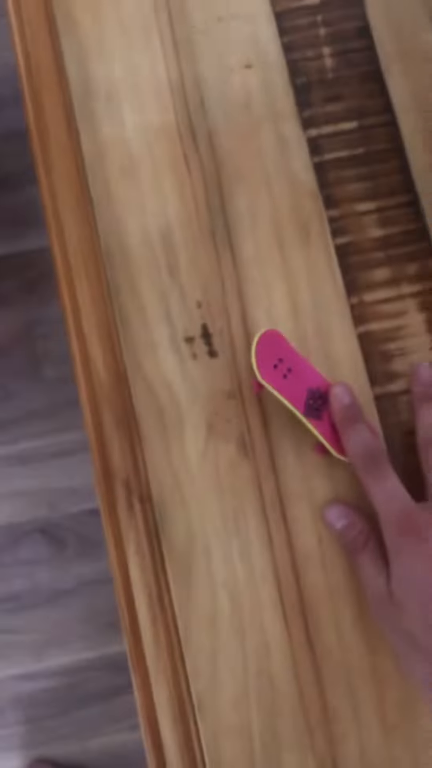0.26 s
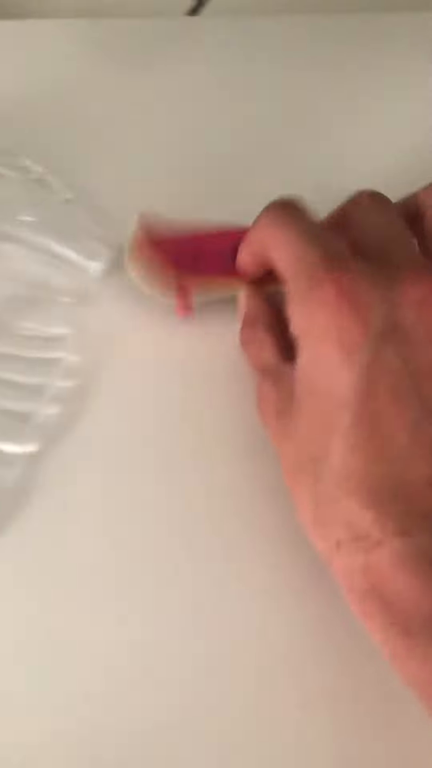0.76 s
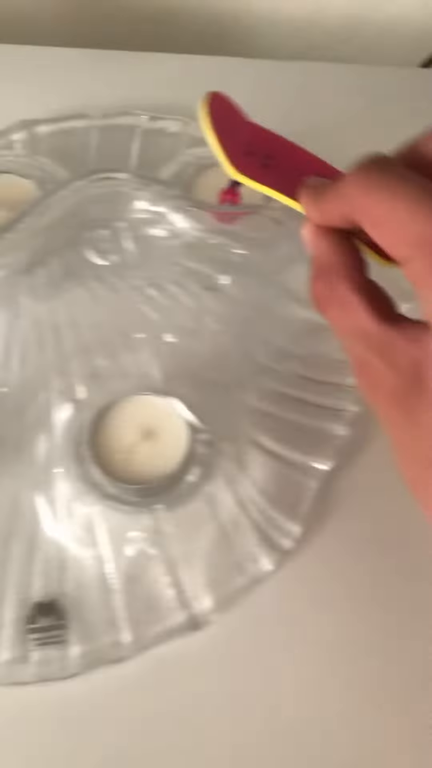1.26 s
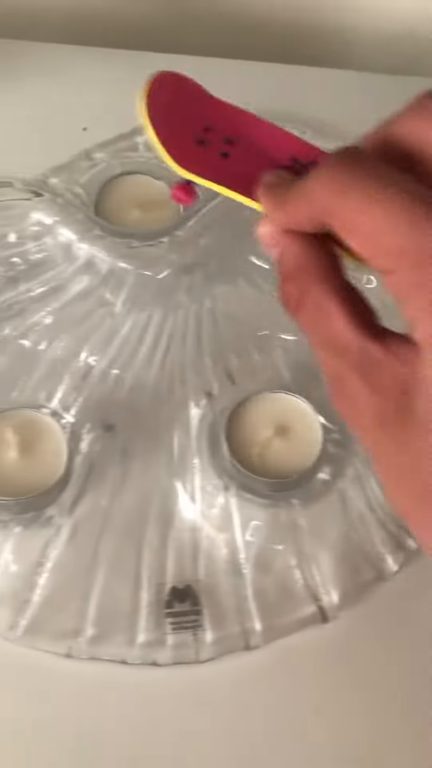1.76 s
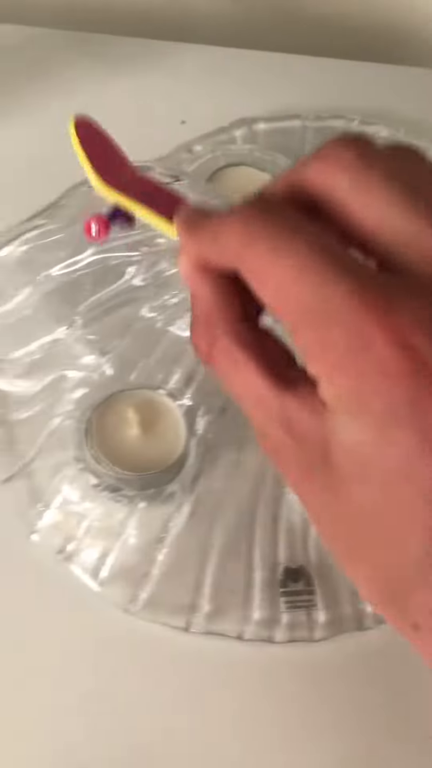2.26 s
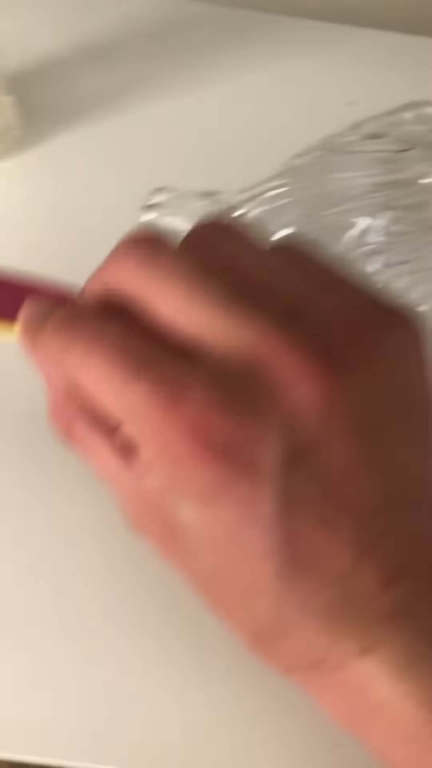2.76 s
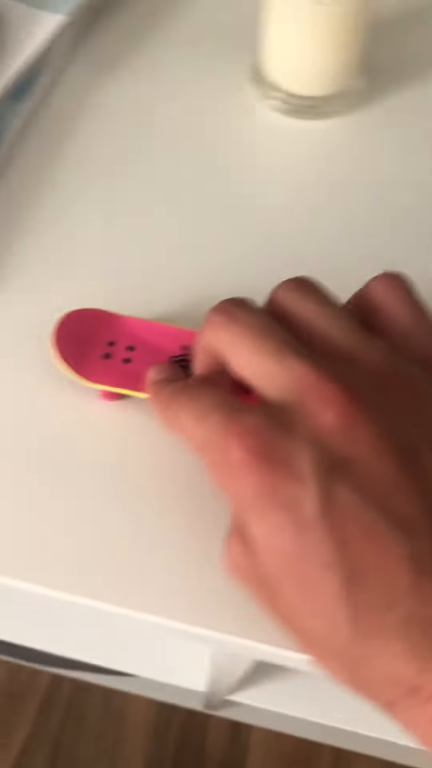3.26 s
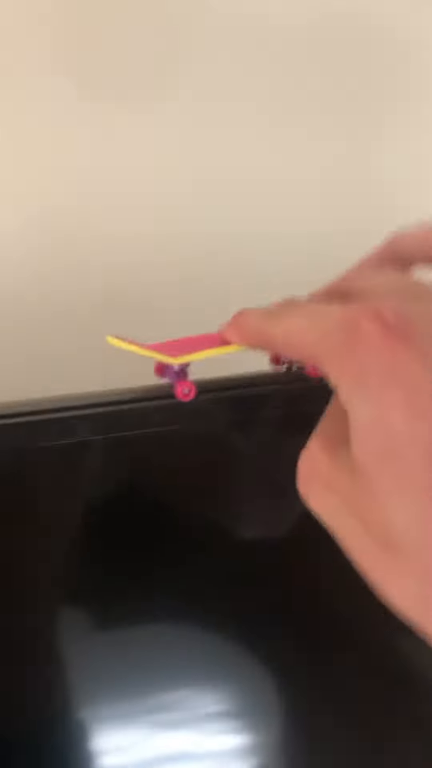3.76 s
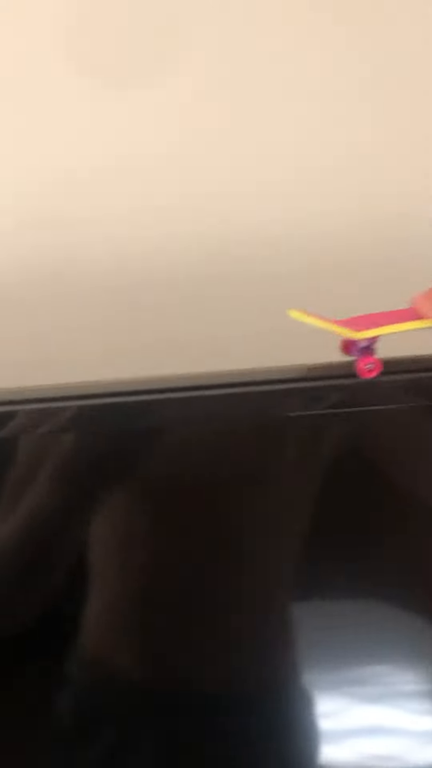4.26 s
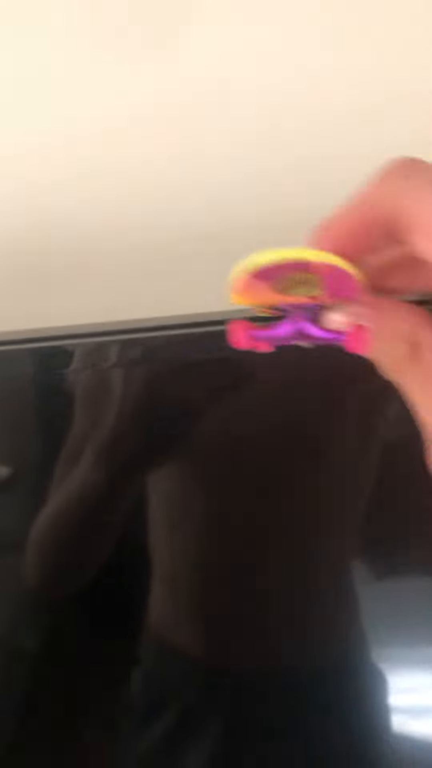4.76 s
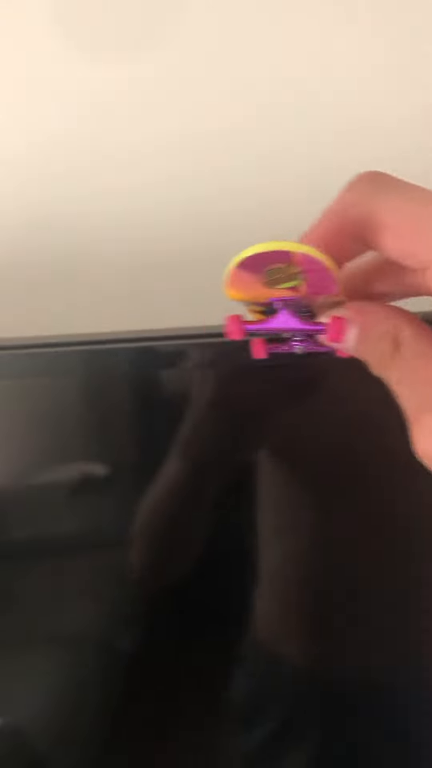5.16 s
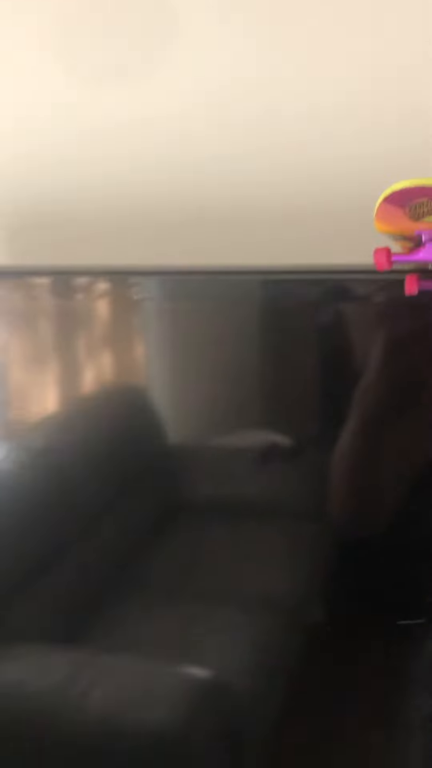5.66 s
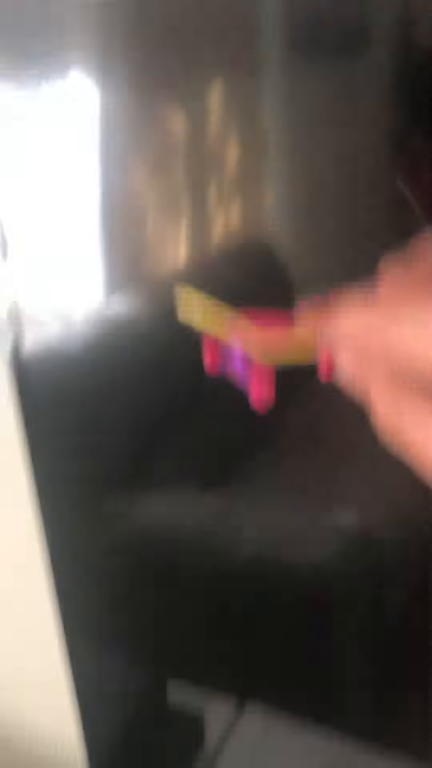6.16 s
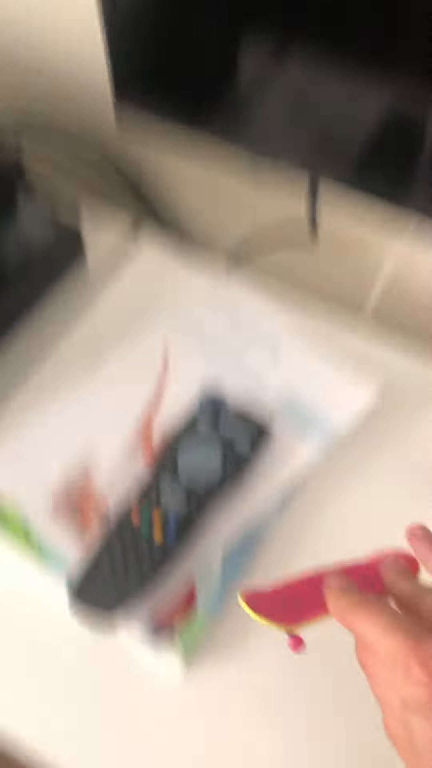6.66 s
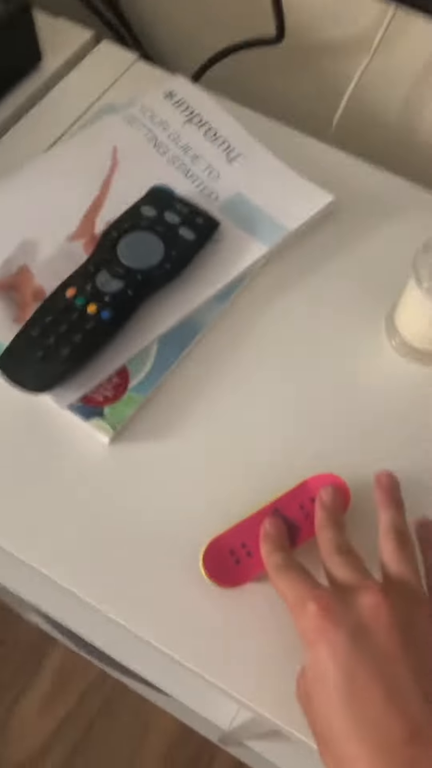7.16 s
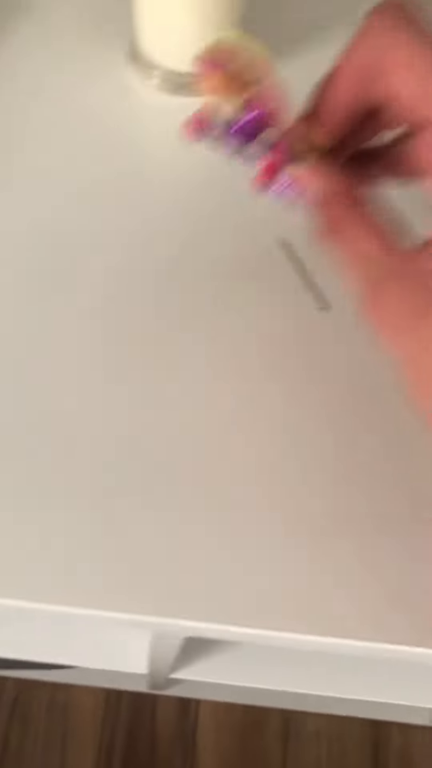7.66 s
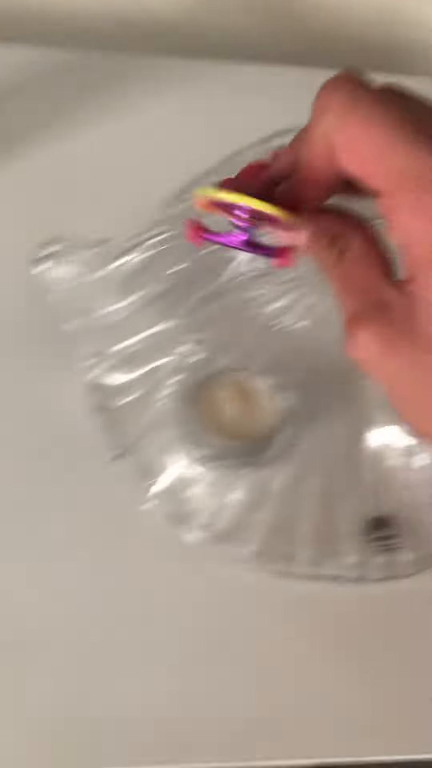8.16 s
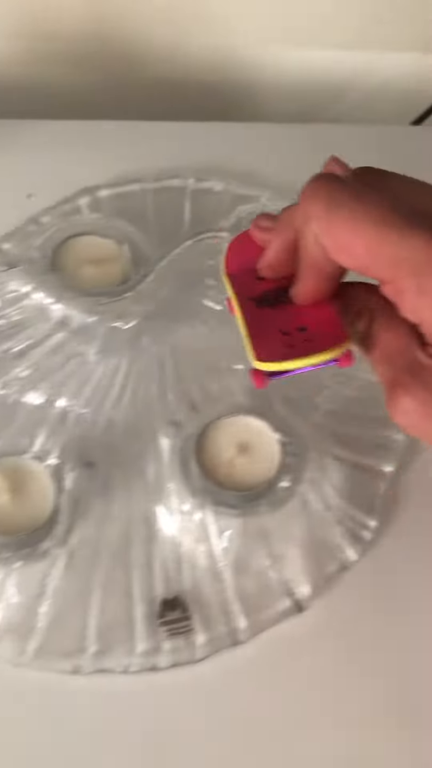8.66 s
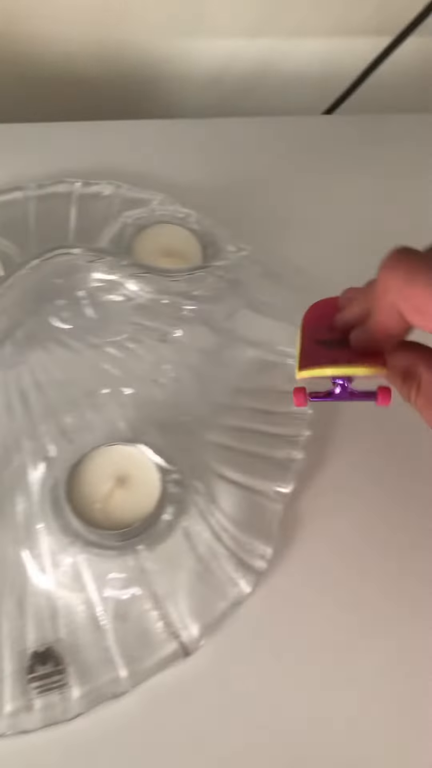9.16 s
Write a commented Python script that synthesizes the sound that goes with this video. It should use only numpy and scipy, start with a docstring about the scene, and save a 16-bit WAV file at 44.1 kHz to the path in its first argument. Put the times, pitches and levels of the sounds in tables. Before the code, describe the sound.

A toy skateboard is played with close to the microphone in a small, quiet room with a short echo. After a faint scuff, its wheels rumble briefly on a cabinet top and it pops at about 0.8 seconds. From 1 to 2.5 seconds it taps and clinks unevenly over a glass dish. At 2.9 seconds it lands with a sharp clack and rolls softly on the hollow cabinet. From about 3.8 seconds it runs along a plastic screen edge, droning until 4.5, then sliding with a thin hiss, faint squeaks and a click near 6 seconds. A loud double clack on the cabinet comes at 6.7 seconds, followed by a short roll and a knock. Lighter glassy taps and rattles run from 7.8 to 9 seconds, and a quick cluster of sharp clacks lands at about 9.3 seconds.

```python
"""A small, hard-walled room, where a toy skateboard is steered with two fingers close to a hand-held phone.
It rolls and pops on a hollow cabinet's top, taps over a ribbed glass dish, lands on the cabinet and grinds
along the plastic edge of a flat screen. Tiny bumps under the wheels make each surface rumble, hard blows
crack the deck and ring what they hit, and sliding makes a hiss. Two sudden cuts split the sound into
three parts; each cut stops the echo and changes the level of the room's hush."""
import sys
import numpy as np
from scipy import signal
from scipy.fft import rfft, irfft, next_fast_len
from scipy.io import wavfile
from scipy.ndimage import uniform_filter1d

SR = 44100
rng = np.random.default_rng(int(sys.argv[2]) if len(sys.argv) > 2 else 0)


def unload_wav(signal):
    """Save mono or channel-first audio to the path in sys.argv[1] as 16-bit WAV at rate SR, clipped to [-1, 1]."""
    wavfile.write(
        sys.argv[1],
        SR,
        np.round(np.clip(np.atleast_2d(signal).T, -1, 1) * 32767).astype(np.int16),
    )


N = 414521
FIRST_CUT_S, SECOND_CUT_S = 0.622, 3.667
BEFORE_SECOND_CUT = np.arange(N) < SECOND_CUT_S * SR


def undb(db):
    """Turn decibels (dB) into a number to multiply by."""
    return 10 ** (np.asarray(db) / 20)


def unit(x):
    """Scale a sound to an average (rms) level of 1."""
    return x / np.sqrt(np.mean(x ** 2))


def add(out, start_s, sound):
    """Mix a sound in at its start time."""
    i = int(start_s * SR)
    out[i:i + len(sound)] += sound[:N - i]


def drift(rate):
    """Glide to a new random value, rate times a second."""
    step = int(SR / rate)
    return uniform_filter1d(np.repeat(rng.standard_normal(N // step + 1), step), step)[:N]


def strokes(rows, rise=5900, fall=168):
    """Level curve from (start s, length s, dB) rows; rise and fall are in dB per second."""
    t = np.arange(0, N / SR + .001, .001)
    power = sum(undb(db - rise * np.maximum(start - t, 0) - fall * np.maximum(t - start - length, 0)) ** 2
                for start, length, db in rows)
    return np.interp(np.arange(N) / SR, t, np.sqrt(power))


def resonate(x, body):
    """Ring an object's tones, given as (Hz, width Hz, dB) rows; every second one is flipped."""
    return sum((-1) ** k * undb(db) * signal.lfilter(*signal.iirpeak(hz, hz / width, SR), x)
               for k, (hz, width, db) in enumerate(body))


def grit(rate, scatter_db, smooth):
    """A rough surface: about rate bumps a second, uneven in size, plus smooth rubbing noise."""
    sizes = undb(scatter_db * np.minimum(rng.exponential(size=N), 3))
    bumps = (rng.random(N) < rate / SR) * rng.choice([-1, 1], N) * sizes
    return unit(bumps) + smooth * rng.standard_normal(N)


def ride(body, rate, scatter_db, smooth, wobble_db, soft_hz, shift_db=0):
    """Bumps, dulled above soft_hz, shake an object; each tone wavers by shift_db, all by wobble_db."""
    push = signal.lfilter(*signal.butter(2, soft_hz, fs=SR), grit(rate, scatter_db, smooth))
    ring = sum((-1) ** k * undb(shift_db * drift(14)) * resonate(push, [tone])
               for k, tone in enumerate(body))
    return unit(ring) * undb(wobble_db * drift(40))


# The colour of the room's hush. Each row: pitch in Hz, level in dB.
HUSH_COLOUR = [(88, -44), (150, -5), (481, -2), (673, -3.5), (1150, -7), (8120, -25.5), (15300, -37),
               (16900, -36.5)]

def room_hush():
    """Soft, low background noise that wavers a little."""
    size = next_fast_len(N)
    hz = np.maximum(np.arange(size // 2 + 1) * SR / size, 1)
    row_hz, row_db = np.transpose(HUSH_COLOUR)
    colour = undb(np.interp(np.log(hz), np.log(row_hz), row_db))
    noise = irfft(rfft(rng.standard_normal(size)) * colour, size)[:N]
    return unit(noise) * undb(0.67 * drift(2.8))


def wall_echo(level_db=-10, low_fade_s=.52, high_fade_s=.26):
    """The walls' answer to one click: thin walls let the bass out, and the treble dies first."""
    t = np.arange(SR // 2) / SR
    noise = signal.lfilter(*signal.butter(1, 900, "high", fs=SR), rng.standard_normal(len(t)))
    low = signal.sosfilt(signal.butter(1, 5000, fs=SR, output="sos"), noise)
    tail = low * undb(-60 * t / low_fade_s) + (noise - low) * undb(-60 * t / high_fade_s)
    tail *= np.minimum(t / 0.0036, 1)  # the first echoes take a moment
    return undb(level_db) * tail / np.sqrt(np.sum(tail ** 2))


# Fingers shifting on the phone. Each row: start in seconds, length in seconds, level in dB.
FINGER_SHIFTS = [(0.0, 0.55, -62), (2.1, 0.018, -43), (2.48, 0.0092, -51), (2.93, 0.0072, -42.5),
                 (5.15, 0.077, -46), (6.75, 0.0061, -45), (6.98, 0.0065, -47), (7.21, 0.022, -55),
                 (7.82, 0.021, -50)]

def phone_grip(hold_db=-62):
    """The hand sends a faint rumble and dull thumps through the phone's body."""
    rub = grit(rate=71, scatter_db=1.7, smooth=1.2)
    body = resonate(rub, [(68.6, 52, 0.078), (122, 110, -2.1)])
    thump = resonate(body, [(94, 240, 0)])
    return unit(thump) * (undb(hold_db) + strokes(FINGER_SHIFTS, rise=1700, fall=310))


def cabinet_hum():
    """Slow wheels wake the hollow cabinet's lowest tone, twice."""
    level = strokes([(2.92, 0.67, -55)]) * BEFORE_SECOND_CUT + strokes([(7.32, 0.21, -47)])
    return level * ride([(256, 26, 0)], rate=410, scatter_db=3, smooth=1.1, wobble_db=2.5, soft_hz=1000)


def wheel_chirp():
    """A wheel chirps once on the plastic edge, with two high tones."""
    tones = [(2300, 90, 4.5), (4650, 130, -3)]
    chirp = ride(tones, rate=900, scatter_db=1.1, smooth=1.1, wobble_db=3, soft_hz=9000)
    return chirp * strokes([(5.8, 0.046, -50.5)])


# Squeaks. Each row: start in seconds, length in seconds, level in dB.
SQUEAKS = [(5.27, 0.14, -52), (5.5, 0.15, -53.5), (5.87, 0.047, -53)]
# Their tones. Each row: pitch in Hz, width in Hz (narrow rings longer), level in dB.
SQUEAK_TONES = [(1010, 320, 15), (1440, 280, 18.5), (2500, 1500, 7)]

def deck_squeak():
    """The deck, the board's flat top, squeaks dully along the plastic edge."""
    squeak = ride(SQUEAK_TONES, rate=900, scatter_db=0.6, smooth=1.3, wobble_db=2.5, soft_hz=4000)
    return squeak * strokes(SQUEAKS, rise=300)


# Scuffs. Each row: start in seconds, length in seconds, level in dB.
SCUFFS = [(0.36, 0.27, -59), (0.66, 0.076, -52.5), (2.93, 0.044, -44), (3.08, 0.059, -45.5),
          (4.38, 0.056, -45), (4.47, 0.083, -45.5), (6.77, 0.061, -32.5), (6.84, 0.073, -44.5),
          (7.31, 0.13, -51)]
# Their colour. Each row: pitch in Hz, width in Hz, level in dB.
SCUFF_COLOUR = [(2340, 2900, -4), (4900, 6300, -4.5), (8200, 5000, -8.5)]

def scuffs():
    """The wheels and tail brush a surface with a dull hiss."""
    hiss = ride(SCUFF_COLOUR, rate=1500, scatter_db=3, smooth=1.1, wobble_db=2.5, soft_hz=12000)
    return hiss * strokes(SCUFFS, rise=470, fall=780)


# Slides over glass and plastic. Each row: start in seconds, length in seconds, level in dB.
SLIDES = [(3.77, 0.11, -49.5), (3.9, 0.48, -52), (4.36, 0.14, -48.5), (4.6, 0.13, -51), (4.76, 0.36, -56),
          (5.045, 0.085, -52), (5.13, 0.8, -52), (7.84, 0.48, -61.5), (8.4, 0.62, -61)]
# The deck's tones. Each row: pitch in Hz, width in Hz, level in dB.
DECK_TONES = [(4000, 300, -7), (7050, 300, -5), (8600, 500, -3), (10970, 900, -6), (13280, 690, -9),
              (15200, 1500, -4), (9000, 16000, -11)]

def deck_scrape():
    """Deck and axles stick and slip in a fine hiss; each tone flickers as the grip shifts."""
    rub = grit(rate=700, scatter_db=4.2, smooth=0.8) * undb(1.5 * drift(45))
    sideways_db = np.where(np.arange(N) > 4.95 * SR, 3, -3)  # sliding crosswise is brighter
    hiss = np.zeros(N)
    for hz, width, db in DECK_TONES:
        flicker_db = 3.5 * drift(6) + 2.5 * drift(30)
        hiss += undb(flicker_db + sideways_db * (hz > 15000)) * resonate(rub, [(hz, width, db)])
    return unit(hiss) * strokes(SLIDES, rise=470, fall=780)


# Pushes along the screen. Each row: start in seconds, length in seconds, level in dB.
SCREEN_PUSHES = [(3.77, 0.12, -47.5), (3.9, 0.14, -44), (4.095, 0.093, -31.5), (4.19, 0.086, -30),
                 (4.31, 0.12, -29), (4.48, 0.049, -36), (4.6, 0.026, -48.5)]
# The screen's tones. Each row: pitch in Hz, width in Hz, level in dB.
SCREEN_TONES = [(275, 51, 1.5), (367, 26.6, 5), (515, 96, -1.5), (722, 94, -1), (930, 97, 1),
                (1303, 230, -4.5), (1690, 230, -6.5), (2440, 1850, -18.5)]

def screen_roll():
    """Fine, even bumps under the wheels make the plastic screen drone."""
    drone = ride(SCREEN_TONES, rate=800, scatter_db=0.5, smooth=0.96, wobble_db=1, soft_hz=4150,
                 shift_db=2.5)
    return drone * strokes(SCREEN_PUSHES, rise=420)


# Pushes on the cabinet top beside the dish. Each row: start in seconds, length in seconds, level in dB.
CABINET_TOP_PUSHES = [(0.637, 0.034, -40.5), (0.68, 0.14, -35.5), (9.345, 0.066, -30)]
# The top's tones there. Each row: pitch in Hz, width in Hz, level in dB.
CABINET_TOP_TONES = [(406, 200, 13.5), (792, 120, 20), (1616, 81, 15.5), (4900, 3000, -29)]

def cabinet_top_roll():
    """Wheels drum on the top beside the dish; the rumble stops quickly as the board lifts off."""
    rumble = ride(CABINET_TOP_TONES, rate=140, scatter_db=7.5, smooth=1, wobble_db=1.5, soft_hz=6100)
    return rumble * strokes(CABINET_TOP_PUSHES, fall=880)


# Pushes on the cabinet. Each row: start in seconds, length in seconds, level in dB.
CABINET_PUSHES = [(2.903, 0.073, -28.5), (3.1, 0.021, -29.5), (3.2, 0.325, -44.5), (3.56, 0.088, -41.5),
                  (6.737, 0.013, -19.5), (6.76, 0.0042, -16.5), (6.84, 0.067, -35), (7.31, 0.05, -34),
                  (7.4, 0.083, -40)]
# The cabinet's tones. Each row: pitch in Hz, width in Hz, level in dB.
CABINET_TONES = [(257, 60, -14), (670, 50, 0), (770, 55, -3), (962, 45, -5), (1300, 900, -23)]

def cabinet_roll():
    """Wheels land fast and spin out slowly; later, pressed by the hand, the cabinet rings less."""
    wheels = dict(rate=410, scatter_db=3, smooth=0.95, wobble_db=2, soft_hz=2200, shift_db=4.5)
    landing = strokes(CABINET_PUSHES[:1])
    swells = strokes(CABINET_PUSHES[1:4], rise=300)  # wheels already rolling build up gently
    ringing = ride(CABINET_TONES, **wheels) * (landing + swells) * BEFORE_SECOND_CUT
    pressed_tones = [(hz, 3 * width, db) for hz, width, db in CABINET_TONES]
    return ringing + ride(pressed_tones, **wheels) * strokes(CABINET_PUSHES[4:])


def crack(noise, hz, db, fade_s, chatter_s, chatter_hz, chatter_width):
    """A blow rings the little deck, then the loose axles chatter, more after a strong blow."""
    t = np.arange(len(noise)) / SR
    blow = noise * undb(-60 * t / fade_s) * np.minimum(t / 0.0012, 1)
    burst = resonate(blow, [(hz, 1300, 0), (10000, 12000, -7)])
    lumps = undb(4 * np.repeat(noise[::128], 128))  # the level jumps about every 3 ms
    fade = undb(-14 + 0.043 * db - 60 * t / chatter_s)
    chatter = resonate(noise[::-1] * lumps * fade, [(chatter_hz, chatter_width, 0)])
    return undb(db) * (burst / np.abs(burst).max() + chatter)


# Taps on the dish. Each row: start in seconds, strength of the crack in dB,
# pitch of the struck spot in Hz, strength of the low ring in dB.
DISH_TAPS = [(1.0814, -20.5, 6400, -43), (1.0962, -13.5, 3570, -34), (1.1076, -9.5, 6250, -30),
             (1.1294, -11.5, 3090, -23), (1.2249, -42, 3080, -50), (1.3644, -18, 4720, -27.5),
             (1.3732, -10, 4740, -33), (1.52, -16, 3360, -20), (1.5372, -17.5, 4730, -37),
             (1.6389, -28, 7500, -37), (1.718, -36.5, 4670, -40), (1.786, -31, 4720, -45),
             (1.8053, -20.5, 3500, -43), (1.839, -15, 7900, -23), (1.8441, -6, 8040, -28.5),
             (1.855, -13, 11480, -20.5), (2.1252, -18, 1750, -32), (2.242, -45, 7850, -56),
             (2.3037, -25.5, 620, -37.5), (2.5065, -25, 2860, -29.5), (7.7977, -17.5, 2850, -40.5),
             (7.9101, -28, 5200, -38.5), (7.9557, -26.5, 3380, -39.5), (8.0251, -29, 5040, -44.5),
             (8.153, -43.5, 5050, -52), (8.1954, -31, 4950, -35), (8.2065, -35, 1750, -34.5),
             (8.2773, -41, 610, -43.5), (8.3932, -32, 1750, -32), (8.752, -11, 3960, -38),
             (8.7729, -19, 3100, -31), (8.8285, -42, 3100, -36.5), (8.9763, -43, 624, -43.5),
             (9.0145, -35, 5650, -60)]
# The glass's tones. Each row: pitch in Hz, level in dB, seconds to fade by 60 dB.
DISH_TONES = [(620, -3, .08), (1445, -1, .08), (1525, -4, .06), (1750, -2, .075), (1830, -7, .1),
              (2056, -11, .07), (2390, -10, .09), (2860, -10, .1), (3090, -8, .14), (3295, -11, .12),
              (3424, -11, .1), (4070, -6, .09), (4700, -9, .1), (5050, -10, .085), (5400, -11, .09),
              (6336, -9, .06), (7854, -8, .07), (9600, -8, .05), (11480, -8, .05)]

def dish_taps():
    """Each tap hits a new spot, so the tones mix differently; fingers on the dish keep the ring short."""
    out = np.zeros(N)
    t = np.arange(12288) / SR
    hz, tone_db, fade_s = np.transpose(DISH_TONES)
    rings = np.exp(np.outer(2j * np.pi * hz - np.log(1000) / fade_s, t)) * np.minimum(t / 0.0034, 1)
    chances = rng.random((len(DISH_TAPS), 2, len(hz)))
    noises = rng.standard_normal((len(DISH_TAPS), 4096))
    for (start, db, spot_hz, low_db), (weakening, phase), noise in zip(DISH_TAPS, chances, noises):
        blow_db = np.where(hz > 2600, db - 13, low_db)  # the sharp crack drives the high tones
        near_spot = np.abs(np.log(hz / spot_hz)) < .03
        levels = undb(tone_db + blow_db + np.where(near_spot, 4, -18 * weakening))
        add(out, start, np.imag((levels * np.exp(2j * np.pi * phase)) @ rings))  # sum of fading sines
        add(out, start, crack(noise, max(spot_hz, 3000), db - 1, fade_s=0.009,
                              chatter_s=0.07, chatter_hz=7800, chatter_width=21000))
    return out


# Runs over the dish's ribs. Each row: start in seconds, length in seconds, level in dB.
RIB_RUNS = [(2.02, 0.17, -62), (7.84, 0.3, -60.5), (8.42, 0.62, -70), (8.8, 0.19, -65)]

def dish_rattle():
    """Axles tick over the ribs and ring the glass's higher tones."""
    tick = (10000, -12, .001)
    tones = [(hz, 9 / fade_s, db) for hz, db, fade_s in DISH_TONES[1:] + [tick]]
    return strokes(RIB_RUNS) * ride(tones, rate=60, scatter_db=3.5, smooth=0.2, wobble_db=1.5,
                                    soft_hz=14000)


# Drags of the dish. Each row: start in seconds, length in seconds, level in dB.
DISH_DRAGS = [(1.39, 0.12, -43), (2.05, 0.12, -46), (2.46, 0.1, -51), (7.77, 0.098, -52)]
# Their low tones. Each row: pitch in Hz, width in Hz, level in dB.
DRAG_TONES = [(120, 45, 4), (281.5, 404, 6.5), (520, 130, -9.5)]

def dish_rocking():
    """The pressed dish drags on the cabinet, and every tap rocks it briefly."""
    kicks = [(start, 0.0094, low_db - 15) for start, _, _, low_db in DISH_TAPS]
    level = strokes(DISH_DRAGS, rise=750, fall=370) + strokes(kicks, rise=3000, fall=500)
    return level * ride(DRAG_TONES, rate=240, scatter_db=1.1, smooth=1.1, wobble_db=2.5, soft_hz=1300)


# Tones of the stiff top beside the dish. Each row: pitch in Hz, width in Hz, level in dB.
CORNER_TONES = [(460, 210, 6), (1040, 160, 11.5), (1580, 220, 12.5)]
# Blows on wood or plastic. Each row: start in seconds, crack level in dB, crack pitch in Hz,
# thud level in dB.
BLOWS = [(0.6755, -49, 4460, -23.5), (0.7004, -44, 4460, -20.5), (0.7157, -30.5, 4440, -27.5),
         (0.768, -48, 4400, -25.5), (0.7795, -25, 6900, -24), (0.797, -10, 5200, -18),
         (2.876, -4, 4550, -10), (2.8952, -0.5, 3700, -14), (2.8977, -13, 3870, -21.5),
         (3.0244, -27.5, 4730, -26), (3.0634, -44, 5600, -40), (3.097, -27, 4640, -43),
         (3.8834, -28, 3060, -31), (4.5987, -32.5, 5040, -32), (5.856, -38, 8600, -53),
         (5.9285, -21.5, 6100, -30), (6.7256, -2, 3900, -11), (6.7462, 0.5, 4250, -6.5),
         (7.2972, -36, 4320, -30), (7.4487, -14.5, 4220, -18.5), (7.754, -12, 2600, -35),
         (9.3349, -4.5, 6560, -16), (9.3503, -9, 2800, -9.5), (9.3803, -10, 8600, -28),
         (9.3844, -7.5, 6400, -12)]

def board_knocks():
    """Each blow of the deck or wheels cracks, and thumps the surface underneath."""
    out = np.zeros(N)
    t = np.arange(8192) / SR
    deck_clack = (1294, 310, 1.6)
    for start, db, hz, thud_db in BLOWS:
        crack_noise, thud_noise = rng.standard_normal((2, len(t)))
        surface = (CABINET_TOP_TONES if start < 1 else
                   SCREEN_TONES if SECOND_CUT_S < start < 6 else
                   CORNER_TONES if start > 9 else CABINET_TONES)
        thud = resonate(thud_noise * np.exp(-t / 0.0058), surface + [deck_clack])
        add(out, start, undb(thud_db) * thud / np.abs(thud).max())
        add(out, start, crack(crack_noise, hz, db, fade_s=0.012,
                              chatter_s=0.076, chatter_hz=4340, chatter_width=4300))
    return out


def scene():
    """Mix the board, its echo, the hand and the hush into one channel."""
    board = (board_knocks() + dish_taps() + deck_scrape()
             + cabinet_top_roll() + cabinet_roll() + screen_roll()
             + dish_rocking() + cabinet_hum() + wheel_chirp() + dish_rattle() + scuffs() + deck_squeak())
    cuts = [int(FIRST_CUT_S * SR), int(SECOND_CUT_S * SR)]
    parts = np.split(board, cuts)
    walls = wall_echo()
    echo = np.concatenate([signal.fftconvolve(part, walls)[:len(part)] for part in parts])
    hush_level = np.repeat(undb([-56, -56.5, -61.5]), [len(part) for part in parts])
    return (board + echo + phone_grip() + room_hush() * hush_level)[None]


def record(dry, top_hz=16100):
    """The phone cuts off the highest treble."""
    return signal.sosfilt(signal.ellip(8, .2, 70, top_hz, fs=SR, output="sos"), dry)


dry = scene()
out = record(dry)
unload_wav(out)
```